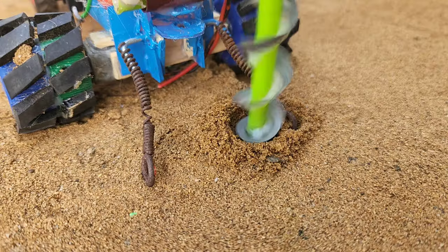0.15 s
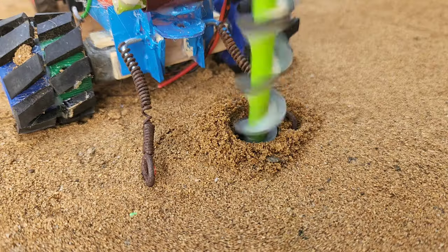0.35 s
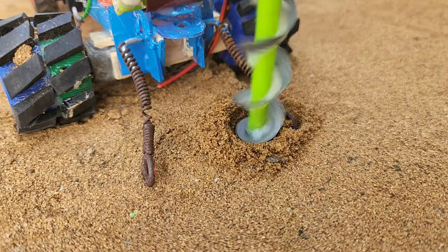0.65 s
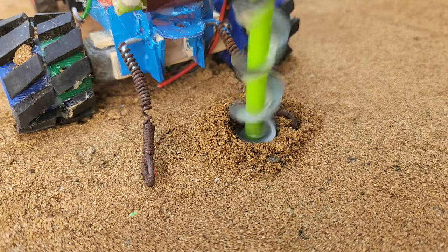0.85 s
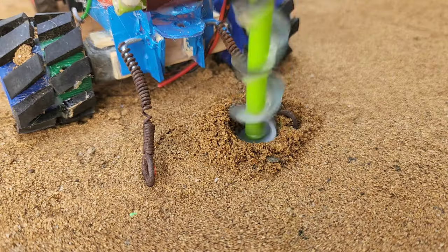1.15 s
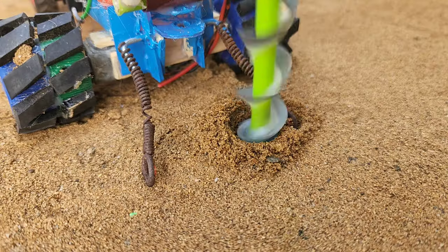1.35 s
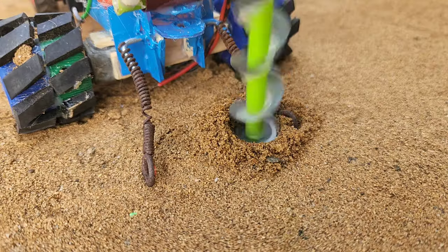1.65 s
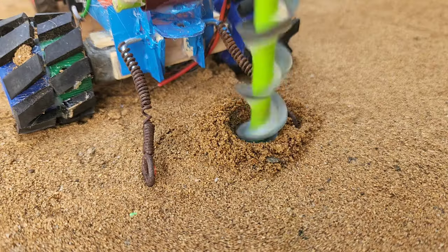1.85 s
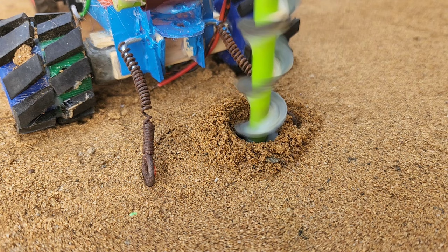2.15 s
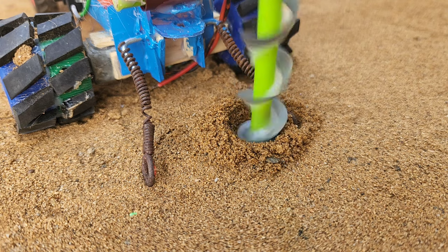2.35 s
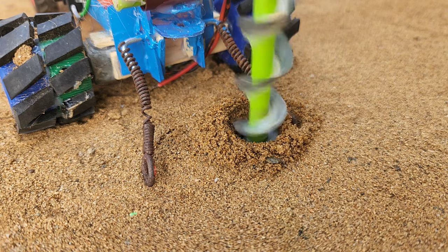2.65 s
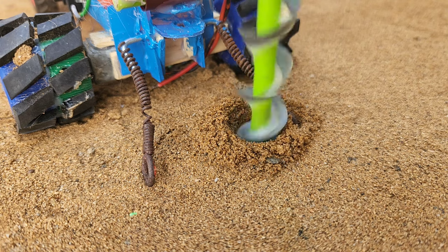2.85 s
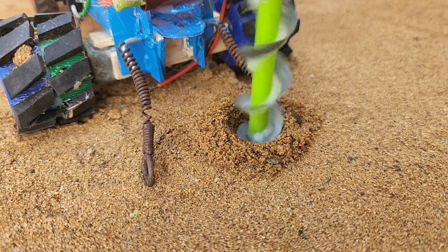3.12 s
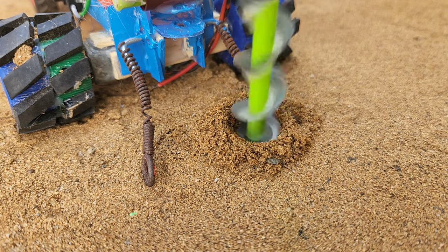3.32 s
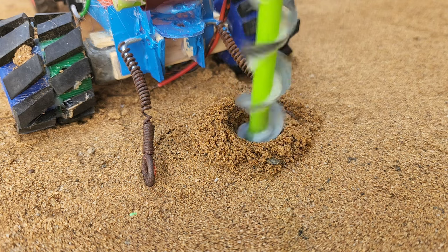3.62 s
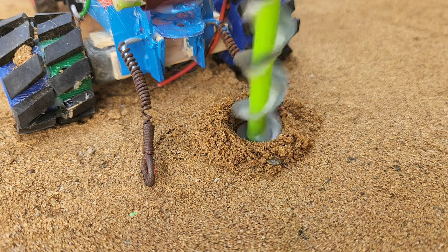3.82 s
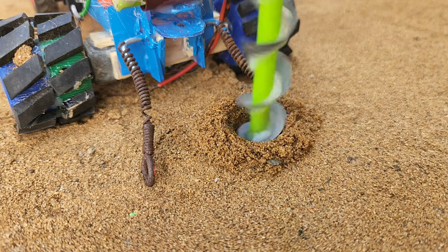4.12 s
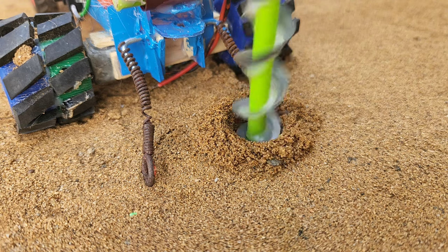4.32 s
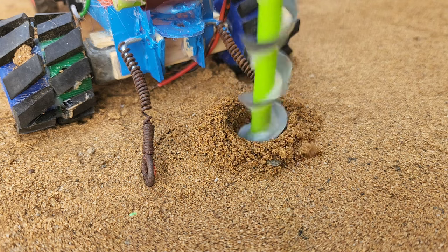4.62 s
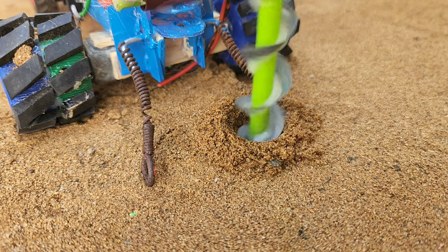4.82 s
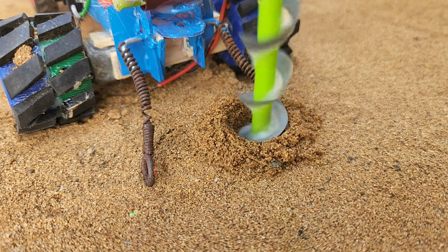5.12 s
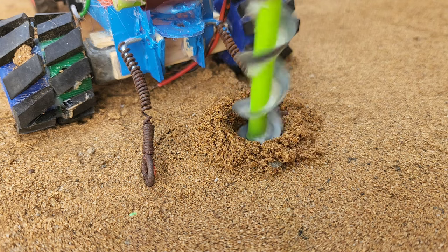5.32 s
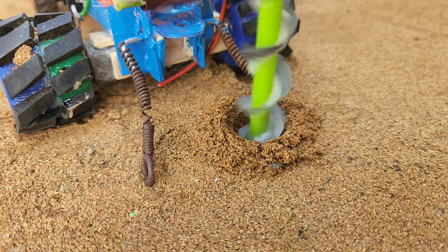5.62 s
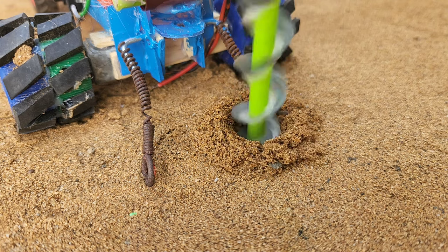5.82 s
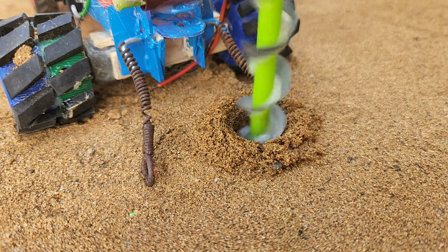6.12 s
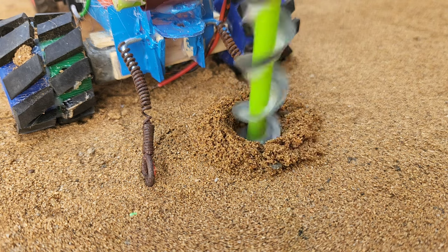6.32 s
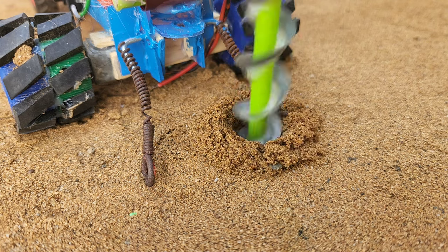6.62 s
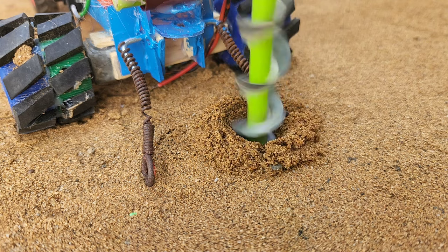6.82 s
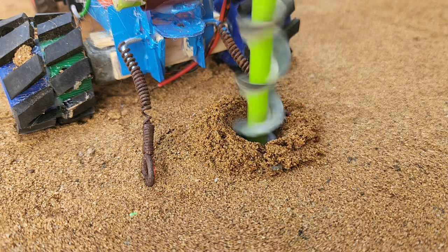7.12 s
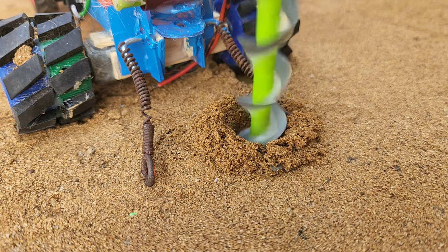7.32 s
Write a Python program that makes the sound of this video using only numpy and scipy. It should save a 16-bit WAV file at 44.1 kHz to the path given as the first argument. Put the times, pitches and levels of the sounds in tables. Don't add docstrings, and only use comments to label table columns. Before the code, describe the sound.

Already running at the start and still running at the end, a toy-sized gearmotor chatters and whirs at close range, slightly nearer the left. The tone is dry, raspy and midrange-heavy, with pulsed fizzy scratches above and weak hum below. Occasional sharper gear knocks break the even texture. A short dull reflection from the sand colours it; the open air adds only soft distant rumble.

```python
import sys
import numpy as np
from scipy import signal
from scipy.io import wavfile

SR = 44100
rng = np.random.default_rng(int(sys.argv[2]) if len(sys.argv) > 2 else 0)


def how_loud(loudness_db):
    steps = np.asarray(loudness_db, float) / 20
    return 10 ** steps


def transcribe(signal):
    frames = np.atleast_2d(signal).T
    limited = np.clip(frames, -1, 1)
    pcm = np.round(limited * 32767).astype(np.int16)
    wavfile.write(sys.argv[1], SR, pcm)


N = 328986


def gears(turns, rattle_db):
    knock_angles = [(.25, .01), (.295, .015), (.44, .04), (.655, .007), (.7, .01), (.75, .012),
                    (.875, .004), (.975, .008)]
    # level in dB, strength scatter in dB, brightness in dB per octave.
    knock_levels = [(-6, 2.2, 0), (-6, 2.2, 2), (-14, 3, 4), (0, 2, 0), (0, 2, .5), (-2, 2, .5),
                    (-4, 1.2, -4), (-11, 2, -4)]
    # start in seconds, peak level in dB.
    hard_knocks = [(0.3336, -17), (0.477, -16), (0.8345, -16), (1.1209, -17), (1.2652, -17), (1.4262, -18),
                   (1.5362, -17), (1.5868, -10), (1.819, -18), (2.573, -13), (2.627, -14), (2.8406, -16),
                   (3.021, -14), (3.362, -18), (3.47, -12), (3.685, -16), (3.7774, -11), (3.8644, -23),
                   (4.4039, -11), (4.817, -13), (5.1432, -26), (5.25, -16), (5.917, -20), (5.9524, -14),
                   (6.008, -15), (6.151, -12.5), (6.2615, -15), (6.8732, -14), (6.9822, -26), (7.435, -11)]
    # frequency in Hz, width in Hz, left level in dB, right level in dB.
    housing_modes = [(409, 305, -22, -21.5), (538, 145, -11, -12.5), (950, 145, -7, -9),
                     (1087, 256, -10.5, -10.5), (1387, 132, -3.5, -5), (1643, 358, -4.5, -6),
                     (1914, 168, -0.5, 1), (2214, 34, -1, 0), (2445, 71.5, 2.5, -1), (2733, 150, -3.5, -2),
                     (3110, 79, -2.5, -8.5), (3284, 350, -7, -6.5), (3860, 67, -11.5, -12.5),
                     (4060, 170, -17, -19), (4920, 290, -26, -24.5), (5800, 230, -41, -56)]
    shaft_hz = 55.6
    force_over_peak_db = 17

    whole = np.arange(-1, turns[-1] + 1)
    where, table = np.array(knock_angles), np.array(knock_levels)
    luck = np.clip(rng.standard_normal((len(whole), len(table), 2)), -2, .9)
    angle = whole[:, None] + where[:, 0] + where[:, 1] * luck[..., 0]
    at = np.interp(angle, turns, np.arange(N)).astype(int).ravel()
    knock_db = table[:, 0] + table[:, 1] * luck[..., 1]
    hard_s, hard_db = np.transpose(hard_knocks)
    at = np.r_[at, (hard_s * SR).astype(int)]
    hard_force_db = np.clip(hard_db, -19, -12) + force_over_peak_db

    loose = grains(per_s=9000., spread_db=1.5)
    worn = loose[0, (turns % 1 * SR / shaft_hz).astype(int)]
    out = np.zeros((2, N))
    for k, (hz, width_hz, left_db, right_db) in enumerate(housing_modes):
        octaves = np.log2(hz / 2000)
        alike = .93 / (1 + (hz / 4200) ** 4)
        worn_share = .6 / (1 + (hz / 2000) ** 4 + (800 / hz) ** 4)
        chatter = share(loose, alike) + worn_share * worn

        tilted_db = knock_db + table[:, 2] * octaves
        blows = np.zeros(N)
        blows[at] = how_loud(np.r_[tilted_db.ravel(), hard_force_db - 2 * octaves])
        blows[[0, -1]] = 0
        landing = np.zeros((3, N))
        landing[:, at] = .6 * rng.standard_normal((3, len(at))) + [[1], [0], [0]]

        meshing = how_loud(-18 + 4 * octaves ** 2 / 2)
        rattle = fade(blows, .0008) + meshing
        soft = 4.8 / (1 + (hz / 3200) ** 3 + (700 / hz) ** 3)
        drive = soft * blows * share(landing, alike) + chatter * rattle
        out += (-1) ** k * port_gains(left_db, right_db) * resonate(drive, hz, width_hz)
    return how_loud(rattle_db + 4.5) * rms_one(out)


def off_sand(x):
    # left in seconds, right in seconds.
    echo_delays = (0.0007045, 0.000656)
    dull = signal.lfilter(*signal.butter(1, 6000, fs=SR), x)
    echo = np.array([delayed(d, s) for d, s in zip(dull, echo_delays)])
    return x + how_loud(-8.5) * echo


def hum(turns):
    # multiple of the shaft speed, left level in dB, right level in dB.
    harmonics = [(2, -68, -63.5), (3, -48, -48), (4, -52.5, -52.5), (5, -57, -59.5), (6, -60.5, -75),
                 (7, -46.5, -48), (8, -51, -55), (9, -50.5, -52.5), (10, -56.5, -53), (11, -52.5, -57.5),
                 (12, -66.5, -60.5), (13, -66, -59), (14, -61, -67), (15, -73, -58), (17, -66, -46.5),
                 (18, -50, -103), (25, -49, -43)]
    out = np.zeros((2, N))
    for multiple, left_db, right_db in harmonics:
        spread = .2 * rng.standard_normal()
        cycles = round(multiple) * (turns - .82) - .35 + spread
        sway = how_loud(0.51 * drift(2.5))
        tone = np.sqrt(2) * np.cos(2 * np.pi * cycles) * sway
        out += tone * port_gains(left_db, right_db)
    return out


def brushes(turns, scratch_db):
    scratch_angles = [(.17, .03, .05), (.25, .01, .03), (.34, .04, .06), (.475, .035, .07), (.7, .09, .09)]
    # level in dB, scatter in dB.
    scratch_levels = [(-16, 9), (0, 6), (-10, 4), (1.5, 3), (-8, 3)]
    # frequency in Hz, width in Hz, left level in dB, right level in dB.
    brush_modes = [(4860, 1180, 2, 0), (7890, 1530, -2.5, -3.5), (8510, 1250, 1, -1.5),
                   (10450, 650, 0, -0.5), (10960, 1670, 1, -3.5), (13100, 1900, 0.4, -1),
                   (15330, 2000, 0.5, -6.5)]
    pressure = how_loud(-8 + 2.5 * drift(30.))
    for (angle, rise, fall), (level_db, scatter_db) in zip(scratch_angles, scratch_levels):
        past = turns - angle + .5
        within = past % 1 - .5
        turn_number = np.floor(past).astype(int) + 1
        luck = np.clip(rng.standard_normal(int(turns[-1]) + 3), -2, 2)[turn_number]
        width = np.where(within < 0, rise, fall)
        pressure += how_loud(level_db + scatter_db * luck) * np.exp(-.5 * (within / width) ** 2)
    grit = pressure * share(grains(per_s=15000., spread_db=2.0), alike=0.08)
    out = np.zeros((2, N))
    for k, (hz, width_hz, left_db, right_db) in enumerate(brush_modes):
        out += (-1) ** k * port_gains(left_db, right_db) * resonate(grit, hz, width_hz)
    out = signal.sosfilt(signal.butter(2, 4200, "high", fs=SR, output="sos"), out)
    return how_loud(scratch_db + 6.0) * rms_one(out)


def open_air(rumble_db):
    mid, side, mid_high, side_high = rng.standard_normal((4, N))
    noise = mid + 0.23 * side * [[1], [-1]]
    high_noise = mid_high + 0.21 * side_high * [[1], [-1]]
    low = band(noise, 2, 48, 76)
    upper = band(noise, 2, 90, 150)
    edge = band(high_noise, 3, 245, 350)
    flicker = how_loud(-58.5 + 3. * drift(4.4))
    return how_loud(rumble_db + 1.5) * rms_one(low) + how_loud(-47.5 - 16.5) * rms_one(upper) + flicker * rms_one(edge)


def swells(t):
    # centre in seconds, rise above the usual level in dB.
    swell_times = [(.03, 6), (.5, 4), (.95, 2), (2.42, 4), (2.96, 7), (3.75, 6), (5.1, 3), (6.67, 3),
                   (7.07, 4)]
    usual_db, half_width_s = -64.5, .08
    return usual_db + sum(db * np.exp(-.5 * ((t - s) / half_width_s) ** 2) for s, db in swell_times)


def grains(per_s, spread_db):
    size = (3, N)
    sizes = how_loud(spread_db * np.minimum(rng.exponential(1, size), 4)) * np.sign(rng.standard_normal(size))
    return rms_one(sizes * (rng.random(size) < per_s / SR))


def share(streams, alike):
    return np.sqrt(alike) * streams[0] + np.sqrt(1 - alike) * streams[1:]


def port_gains(left_db, right_db):
    return how_loud(np.array([[left_db], [right_db]]))


def resonate(x, hz, width_hz):
    r = np.exp(-np.pi * width_hz / SR)
    top = (1 - r * r) / 2 * np.array([1, 0, -1])
    return signal.lfilter(top, [1, -2 * r * np.cos(2 * np.pi * hz / SR), r * r], x)


def band(x, order, low_hz, high_hz):
    return signal.sosfilt(signal.butter(order, [low_hz, high_hz], "band", fs=SR, output="sos"), x)


def fade(x, seconds):
    return signal.lfilter([1], [1, -np.exp(-1 / (seconds * SR))], x + 1e-18)


def drift(rate):
    r = np.exp(-80 * np.pi * rate / SR)
    slow = signal.lfilter([1], [1, -2 * r, r * r], rng.standard_normal(N // 40 + 2002))[2000:]
    return np.interp(np.arange(N) / 40, np.arange(len(slow)), rms_one(slow))


def delayed(x, seconds):
    return np.interp(np.arange(N) - seconds * SR, np.arange(N), x, left=0)


def rms_one(x):
    return x / np.sqrt(np.mean(x ** 2) + 1e-20)


def scene():
    t = np.arange(N) / SR
    start_turns, start_hz, sag_hz_per_s = -.048, 55.997, .0899
    turns = start_turns + start_hz * t - sag_hz_per_s * t ** 2 / 2
    rattle = how_loud(0.5) * off_sand(gears(turns, rattle_db=-31.5))
    left, right = hum(turns) + rattle + brushes(turns, scratch_db=-44.5)
    right_lag_s = 6 / 44100
    return np.array([left, delayed(right, right_lag_s)]) + open_air(swells(t))


def top_cut(x):
    return signal.sosfilt(signal.butter(12, 16300, fs=SR, output="sos"), x)


def record(dry):
    rounded = .5 * np.tanh(dry / .5)
    low_pass = signal.ellip(10, .5, 60, 15850 - 300, fs=SR, output="sos")
    finished = signal.sosfilt(low_pass, rounded)
    return top_cut(finished)


dry = scene()
out = record(dry)
transcribe(out)
```